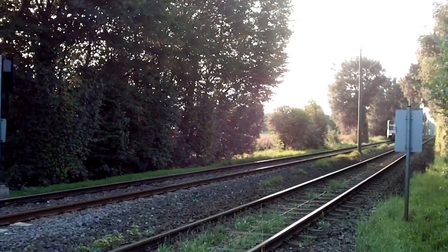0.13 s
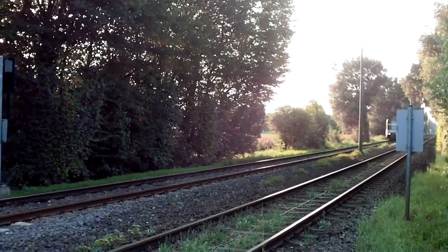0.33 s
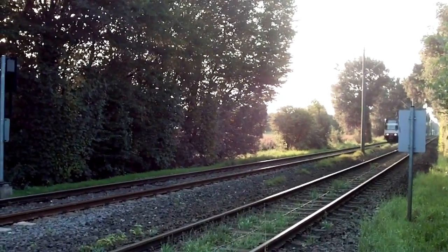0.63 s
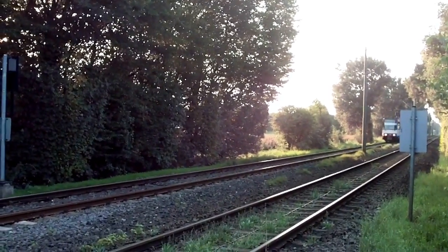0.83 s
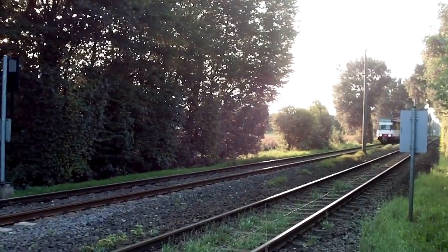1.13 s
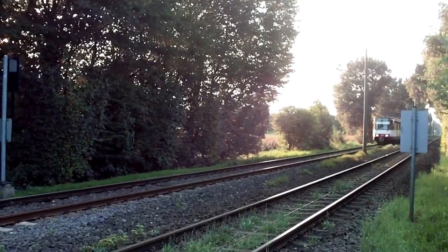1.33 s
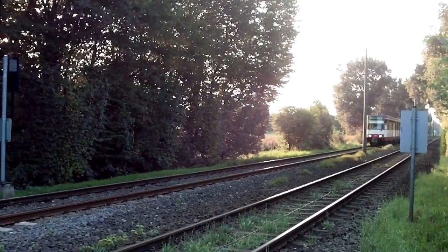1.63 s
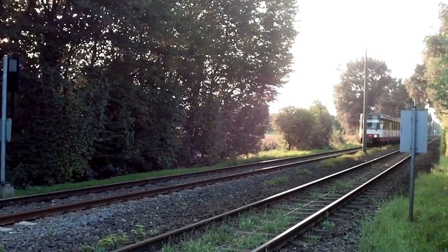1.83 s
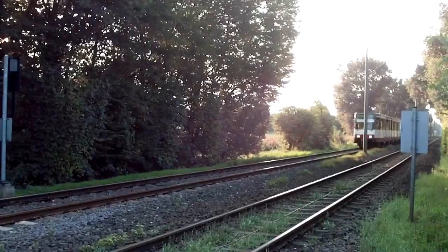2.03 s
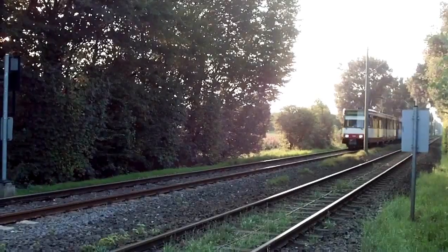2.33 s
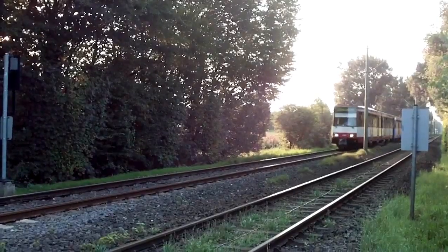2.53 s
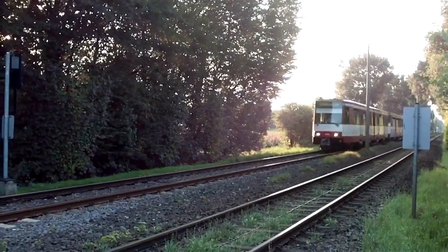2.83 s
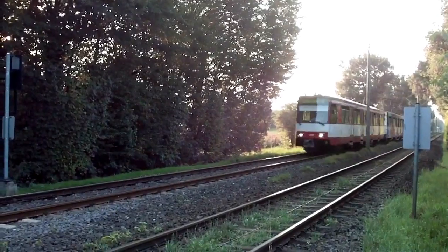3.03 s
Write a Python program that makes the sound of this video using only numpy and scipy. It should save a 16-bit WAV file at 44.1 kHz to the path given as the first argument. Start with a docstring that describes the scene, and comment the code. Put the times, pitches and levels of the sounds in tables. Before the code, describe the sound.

A tram approaches, its ringing rails and rolling rumble growing steadily louder.

```python
"""A tram approaching

A tram comes closer at steady speed, heard in mono. The rails sing ahead of it: a mid roar,
a ring that flutters as the wheels cross the sleepers (the beams under the rails), and a fine
high sizzle. Wheel and body noise swell over a deep drone and rumble, with soft outdoor hiss
and one faint chirp behind them."""
import sys
import numpy as np
from scipy import signal
from scipy.fft import rfft, irfft
from scipy.io import wavfile

SR = 44100
rng = np.random.default_rng(int(sys.argv[2]) if len(sys.argv) > 2 else 0)


def materialize(psi):
    """Save the field psi as 16-bit PCM at rate SR to the path in sys.argv[1].

    A 1-D psi becomes a single channel; in a 2-D psi each row is a channel.
    """
    bounded = np.clip(np.atleast_2d(psi).T, -1, 1)
    quanta = np.round(bounded * 32767).astype(np.int16)
    wavfile.write(sys.argv[1], SR, quanta)


N = 140238
TIME = np.arange(N) / SR
FREQS = np.maximum(np.fft.rfftfreq(N, 1 / SR), 1)


def from_db(db):
    """Turn decibels into a number to multiply a sound by."""
    return 10 ** (np.asarray(db) / 20)


def noise_through(gain):
    """Random noise with a gain for each frequency, scaled to an average power of 1."""
    noise = irfft(rfft(rng.standard_normal(N)) * gain, N)
    return noise / np.sqrt(np.mean(noise ** 2) + 1e-20)


def coloured(spectrum):
    """Noise shaped by (f/Hz, relative level/dB) points, fading steeply past both ends."""
    hz, db = np.transpose(spectrum)
    edges = np.minimum(FREQS / hz[0], 1) ** 4 * np.minimum(hz[-1] / FREQS, 1) ** 4
    return noise_through(from_db(np.interp(np.log(FREQS), np.log(hz), db)) * edges)


def drift(rate_hz):
    """A random wobble of about 1 either way, mostly slower than the given rate."""
    return noise_through(1 / (1 + (FREQS / rate_hz) ** 2))


def flicker(db):
    """Turn a wobble in decibels into a gain that keeps the average power the same."""
    gain = from_db(db)
    return gain / np.sqrt(np.mean(gain ** 2))


def level(curve):
    """A gain that follows (t/s, level/dB) points."""
    return from_db(np.interp(TIME, *np.transpose(curve)))


def burst(at_s, hz, db, width_s):
    """A short tone that fades in and out, loudest at the given time."""
    t = TIME - at_s
    bell_curve = np.exp(-.5 * (t / width_s) ** 2)
    return from_db(db) * bell_curve * np.sin(2 * np.pi * (hz * t + rng.random()))


# Tone of the rails' roar, ring between sleepers, and sizzle: f/Hz, relative level/dB
ROAR_TONE = [(380, -30), (470, -15), (530, -5.5), (585, -2.5), (630, -4), (700, -3.5), (775, -10.5),
             (850, -5.5), (930, 2), (1040, 0.5), (1140, 0), (1190, -6), (1290, -4.5), (1420, -9),
             (1480, -18), (1800, -22)]
RING_TONE = [(1220, -28), (1290, -7), (1325, 0), (1400, 1.5), (1445, -20), (1600, -12), (1800, -26),
             (1940, -18), (2050, -9), (2140, -17.5), (2300, -28)]
SIZZLE_TONE = [(2500, -4.5), (3600, -6), (4200, -1.5), (5000, -3), (5800, -4.5), (6500, -1.5), (7200, -2),
               (7900, 1.5), (9000, 0), (9900, 1.5), (11400, -3.5), (12700, -8), (13700, -15.5),
               (15700, -23)]
# How the roar and the sizzle grow: t/s, level/dB
ROAR_RISE = [(0, -42), (.75, -40.5), (1.3, -38), (1.75, -33.5), (1.98, -33.5), (2.13, -35), (2.4, -30.5),
             (2.9, -29), (3.05, -28.5), (3.16, -25)]
SIZZLE_RISE = [(0, -59.5), (.5, -56.5), (.9, -55), (1.22, -50.5), (1.55, -47), (1.75, -46.5), (2.15, -43),
               (2.42, -42.5), (2.7, -40.5), (3.18, -37.5)]
# Base level that the ring sits below and the sleeper pulses rise above: t/s, level/dB
RING_BASE = [(0, -44), (.6, -43.5), (1.2, -39.5), (1.85, -37.5), (2.4, -37), (3.18, -36.5)]
def rails():
    """Rough wheels shake the rails, which roar, ring and sizzle at their natural pitches."""
    roughness = drift(rate_hz=47)
    roar = coloured(ROAR_TONE) * level(ROAR_RISE) * flicker(db=0.23 * roughness)
    ring = coloured(RING_TONE) * level(RING_BASE) * from_db(-7) * flicker(db=-1.5 * roughness)
    sizzle = coloured(SIZZLE_TONE) * level(SIZZLE_RISE) * flicker(db=0.55 * drift(rate_hz=40))
    return roar + ring + sizzle


# Harder wheel knocks, each landing on the nearest sleeper: t/s, peak level/dB
HARD_KNOCKS = [(.47, -31.5), (1.458, -27), (1.707, -28), (1.805, -24), (1.902, -22), (2.221, -23.5),
               (2.568, -22)]
def sleeper_pulses():
    """Each sleeper the wheels cross sends a short ringing pulse down the rail; a few knock hard."""
    first_s, sleepers_per_s = .028, 31.5
    count = int(sleepers_per_s * N / SR) + 1
    times = first_s + np.arange(count) / sleepers_per_s
    strength, detune = rng.standard_normal((2, count))
    peaks_db = np.interp(times, *np.transpose(RING_BASE)) + 7 + 2 * strength
    for at_s, db in HARD_KNOCKS:
        peaks_db[np.argmin(np.abs(times - at_s))] = db
    pitches_hz = 1352.6 + 22.2 * detune
    return sum(burst(at_s, hz, db, width_s=.0041) for at_s, hz, db in zip(times, pitches_hz, peaks_db))


# Tone of the wheel noise: f/Hz, relative level/dB
WHEEL_TONE = [(400, -9), (550, 2.5), (1000, 1.5), (1500, 2), (1800, -2.5), (2100, 0.5), (2400, -6),
              (3000, -7), (3600, -13.5), (6000, -23)]
# How the wheel noise grows: t/s, level/dB
WHEEL_RISE = [(0, -53), (1, -50), (2.1, -47.5), (2.4, -39), (2.8, -37), (3.18, -36.5)]
def wheels():
    """Wheel noise travels through the air and swells late, as the tram comes close."""
    return coloured(WHEEL_TONE) * level(WHEEL_RISE)


# Tone of the tram body's rumble: f/Hz, relative level/dB
BODY_TONE = [(50, 0.5), (105, 7.5), (160, -1), (195, 0), (230, -2), (268, 1), (290, -4), (315, -3.5),
             (375, -14.5), (450, -10.5), (600, -34)]
def tram_body():
    """The body's rumble gains 13 dB each time the distance to the tram halves."""
    start_m, speed_m_per_s = 90.2, 19.67
    distance_m = start_m - speed_m_per_s * TIME
    halvings = np.log2(start_m / distance_m)
    return coloured(BODY_TONE) * from_db(-58.5 + 13 * halvings)


# The tones that make up the drone: multiple of the lowest pitch, level/dB
DRONE_TONES = [(1, -35), (2, -45), (5, -58.5)]
def machine_drone():
    """A machine hums deeply, wavering a little in pitch and loudness."""
    pitch_hz = 38.92 * (1 + 0.0057 * drift(rate_hz=3.5))
    cycles = np.cumsum(pitch_hz) / SR
    drone = np.zeros(N)
    for multiple, db in DRONE_TONES:
        peak = np.sqrt(2) * from_db(db - 0.1 * drift(rate_hz=1.9))
        drone += peak * np.sin(2 * np.pi * (multiple * cycles + rng.random()))
    return drone


# Tone of the deep rumble: f/Hz, relative level/dB
RUMBLE_TONE = [(18, -20), (25, -4), (35, -10.5), (50, -7), (63, 3), (72, -3), (84, -3), (98, -13),
               (130, -20.5), (200, -28.5), (400, -39)]
# Brief swells in the rumble: t/s, f/Hz, peak level/dB
RUMBLE_SWELLS = [(.36, 66.6, -30.5), (2.49, 27.2, -31), (3.02, 30, -28.5)]
def deep_rumble():
    """A deep rumble grows slowly and swells now and then."""
    swells = sum(burst(at_s, hz, db, width_s=.035) for at_s, hz, db in RUMBLE_SWELLS)
    return swells + coloured(RUMBLE_TONE) * from_db(-40 + 0.82 * TIME)


# Tone of the outdoor hiss: f/Hz, relative level/dB
AIR_TONE = [(100, -5), (185, 3.5), (235, -6.5), (310, 3), (400, -5.5), (1500, -16), (2800, -14.5),
            (3500, -14.5), (6000, -19), (12000, -34), (16000, -27)]
def outdoor_air():
    """Soft outdoor hiss with a faint, thin, very high whistle in it."""
    whistle_hz, width_hz = 13300, 190
    whistle = noise_through(1 / (1 + ((FREQS - whistle_hz) / width_hz) ** 2))
    return from_db(-51.5) * coloured(AIR_TONE) + from_db(-74.5) * whistle


def chirp():
    """One faint, high chirp."""
    return burst(at_s=1.925, hz=4100, db=-51.5, width_s=.018)


def scene():
    """Add up all the sounds, the same on the left and the right."""
    tram = rails() + sleeper_pulses() + wheels() + tram_body()
    background = machine_drone() + deep_rumble() + outdoor_air() + chirp()
    return np.tile(tram + background, (2, 1))


def record(dry):
    """Cut away the very highest treble with a steep filter."""
    cutoff_hz = 15750
    return signal.sosfilt(signal.ellip(12, .1, 80, cutoff_hz, fs=SR, output="sos"), dry)


dry = scene()
out = record(dry)
materialize(out)
```